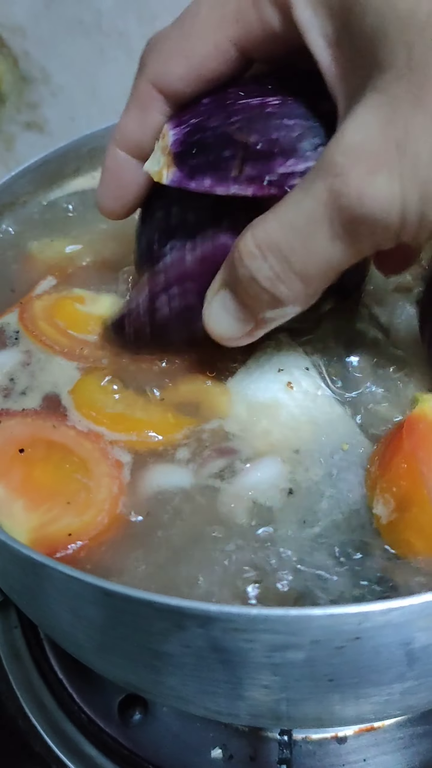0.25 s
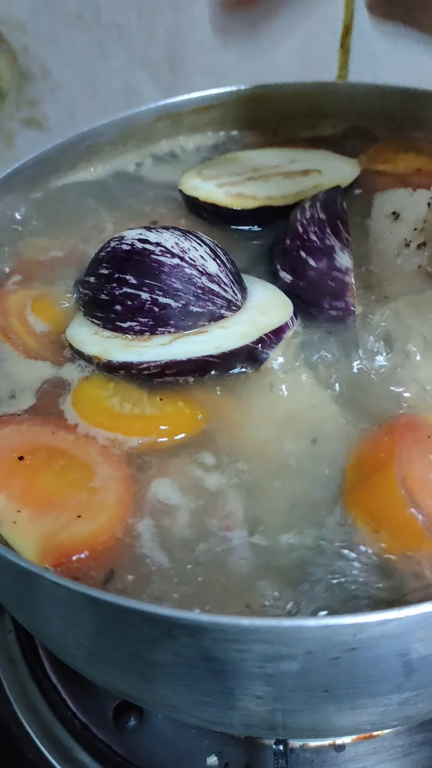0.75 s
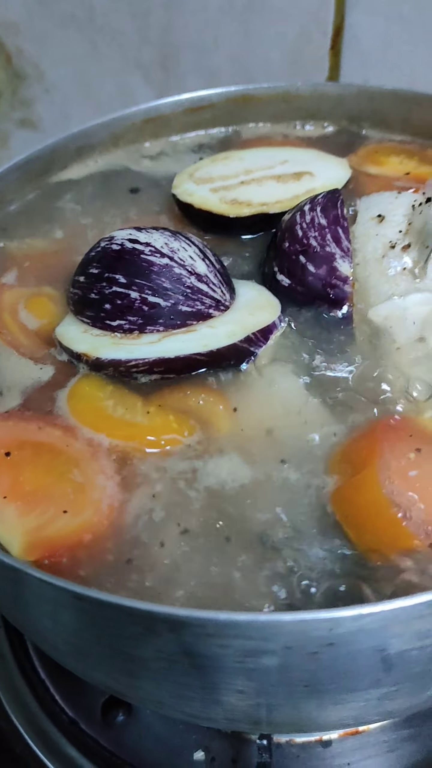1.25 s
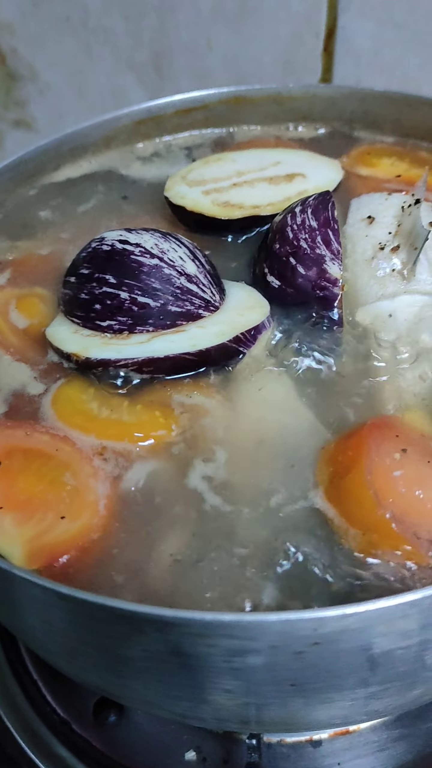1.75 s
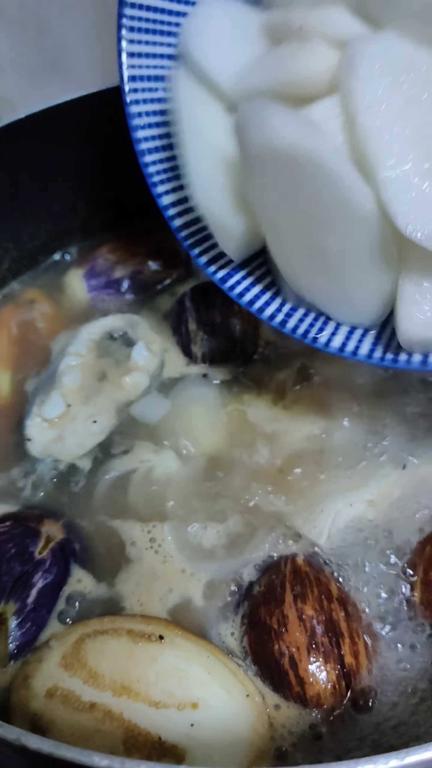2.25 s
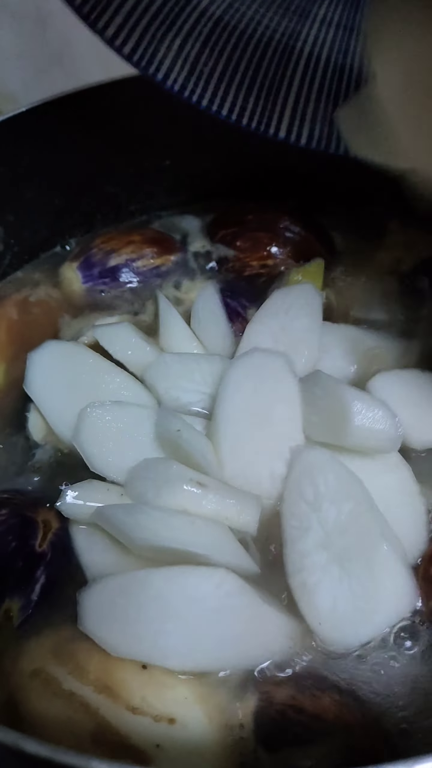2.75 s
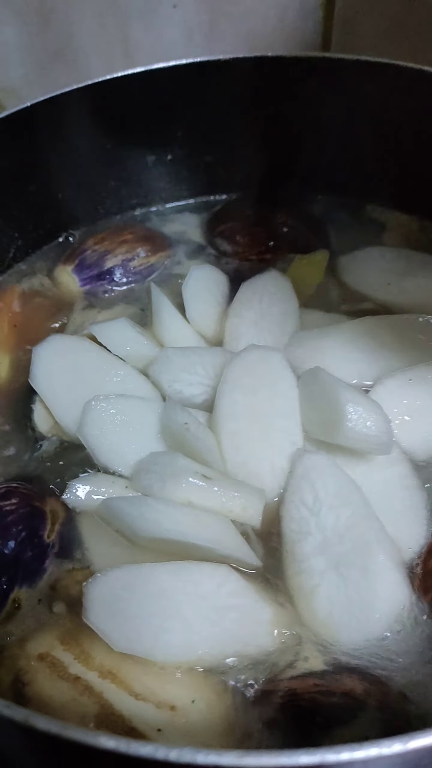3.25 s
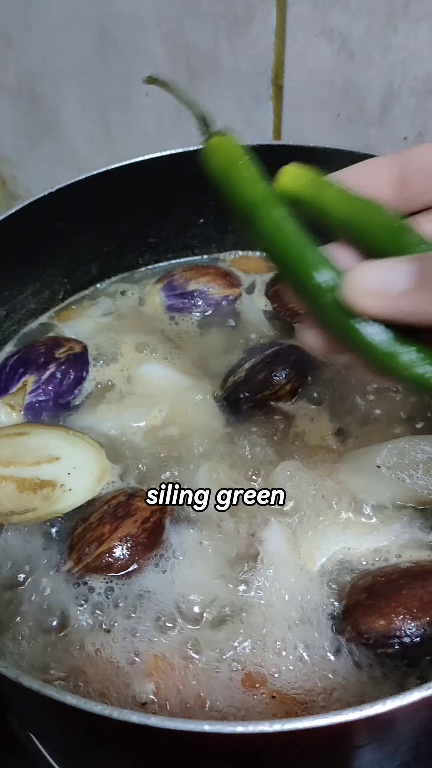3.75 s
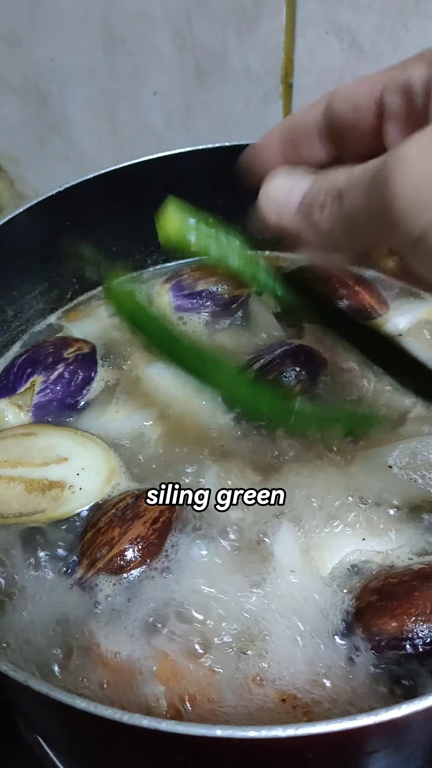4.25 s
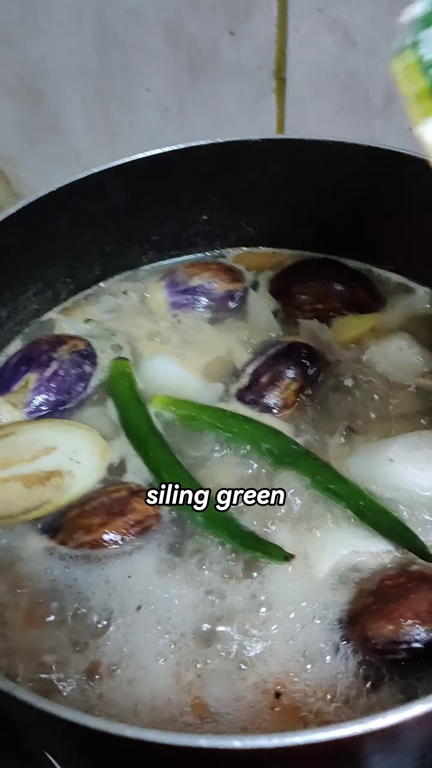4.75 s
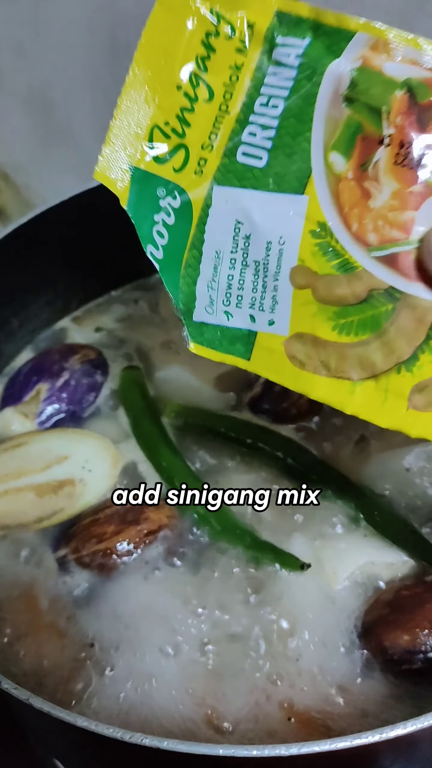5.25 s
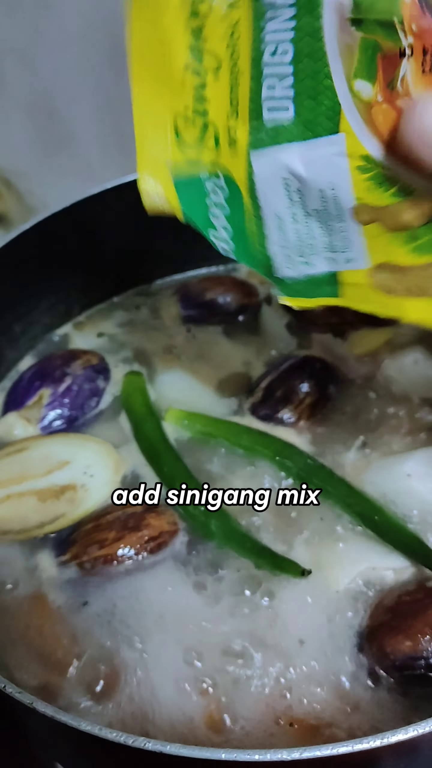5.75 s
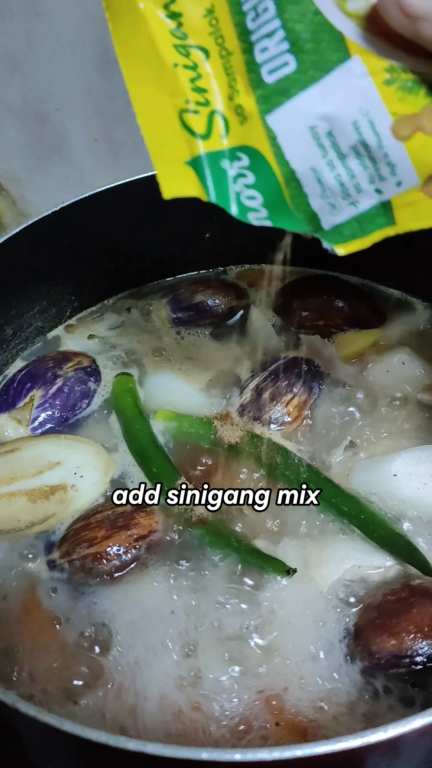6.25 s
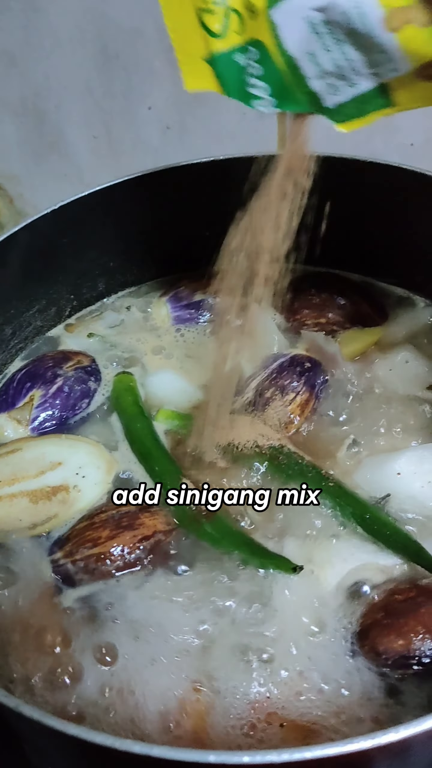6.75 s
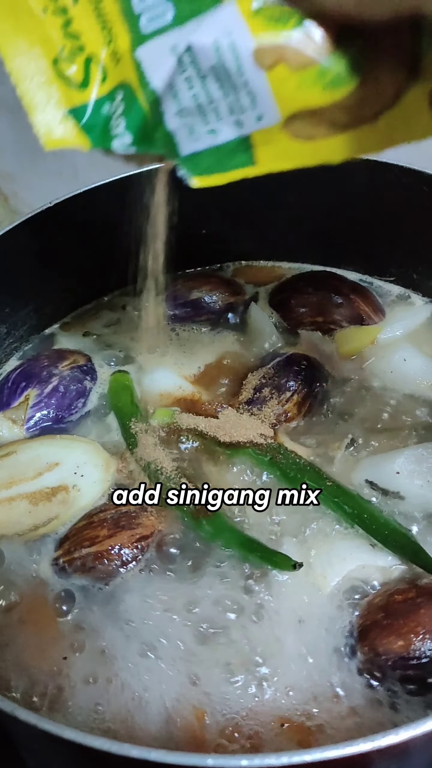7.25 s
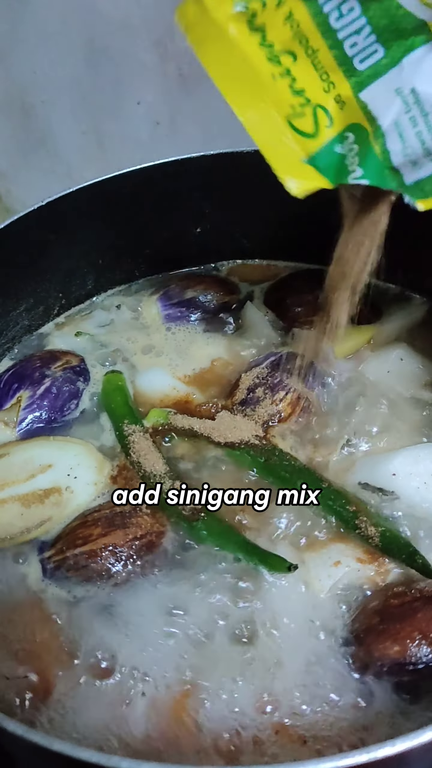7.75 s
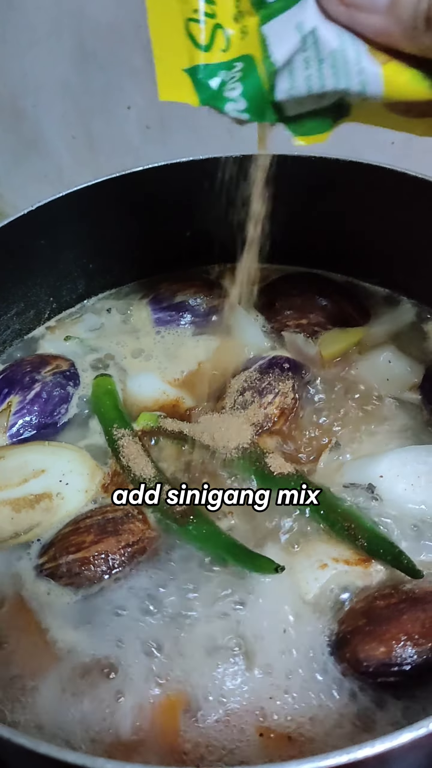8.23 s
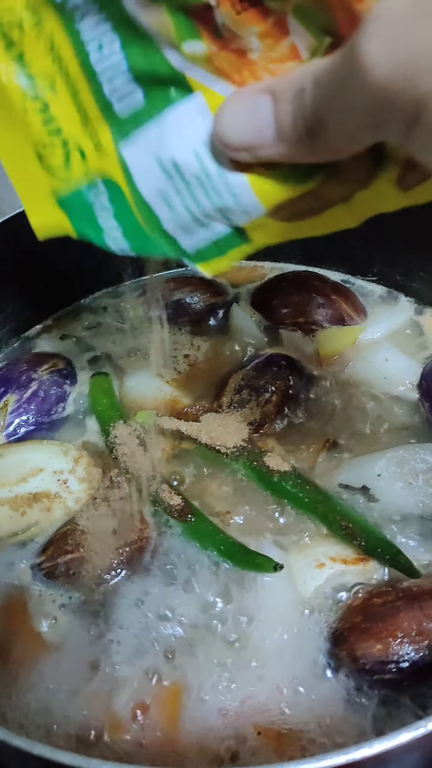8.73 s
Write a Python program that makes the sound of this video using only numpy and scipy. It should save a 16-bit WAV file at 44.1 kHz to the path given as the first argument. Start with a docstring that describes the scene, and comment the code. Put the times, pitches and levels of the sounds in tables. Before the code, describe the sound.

A wooden spatula knocks and scrapes a metal pot, wet plops and a ringing rim blow follow, then foil crackles loudly over boiling soup.

```python
"""A small tiled kitchen: soup boils in a metal pot, close to a microphone whose left port faces the stove.
Steam bubbles ring and rise in pitch, froth fizzes as dense crackle; a thin whistle and hiss lie behind.
A wooden spatula knocks (filtered bursts, damped pot modes) and scrapes (stick-slip crackle); low plops
(rising sines) and wet slaps (noise bursts) follow; one hard blow rings the rim's long, beating modes.
Then a foil sachet is shaken over the swelling boil: swarms of tiny creases and single loud snaps."""
import sys
import numpy as np
from scipy import signal
from scipy.fft import rfft, irfft, next_fast_len
from scipy.io import wavfile
from scipy.ndimage import uniform_filter1d

SR = 44100
rng = np.random.default_rng(int(sys.argv[2]) if len(sys.argv) > 2 else 0)


def inscribe(sig):
    """Save sig as 16-bit PCM at rate SR to the path in sys.argv[1].

    A 1-D sig is mono; a 2-D sig holds one channel per row.
    Samples are clipped to [-1, 1] before scaling.
    """
    pcm = np.round(np.clip(np.atleast_2d(sig).T, -1, 1) * 32767)
    wavfile.write(sys.argv[1], SR, pcm.astype(np.int16))


N = 396459
TIME = np.arange(N) / SR  # s
AGE = np.arange(SR * 3 // 4) / SR  # s since a blow


def amp(db):
    """Decibels to gain."""
    return 10 ** (np.asarray(db) / 20)


def unit(x):
    """x at rms 1."""
    return x / np.sqrt(np.mean(x ** 2) + 1e-20)


def unit_peak(x):
    """x with its loudest 4 ms at rms 1."""
    power = uniform_filter1d(x ** 2, size=176)
    return x / np.sqrt(power.max() + 1e-20)


def fade(t60_s):
    """Exponential decay, 60 dB down after t60_s."""
    return np.exp(-np.log(1000) * AGE / t60_s)


def along(points, hz):
    """Points of (frequency, value), interpolated on a log frequency axis."""
    f, v = np.transpose(points)
    return np.interp(np.log(hz + 1), np.log(f + 1), v)


def gains(rows, outside_db=None):
    """One gain curve per dB column after the time."""
    s, *columns = np.transpose(rows)
    return [amp(np.interp(TIME, s, c, outside_db, outside_db)) for c in columns]


def swells(rows, rise_s, t60_s):
    """Gain of (time, hold, dB) gestures: each rises until its time, holds, dies away; powers add."""
    power = np.zeros(N)
    for s, hold_s, db in rows:
        attack = np.minimum(AGE / rise_s, 1)
        release = np.exp(-np.log(1000) * np.maximum(AGE - rise_s - hold_s, 0) / t60_s)
        add(power, s - rise_s, (amp(db) * attack * release) ** 2)
    return np.sqrt(power)


def add(track, s, sound):
    """Mix a sound into the track at time s."""
    part = track[round(s * SR):][:len(sound)]
    part += sound[:len(part)]


def coloured(x, db_of):
    """x through the causal minimum-phase filter whose gain in dB is db_of(Hz)."""
    m = 2 * next_fast_len(len(x) // 2 + 4096)
    gain = amp(db_of(np.fft.rfftfreq(m, 1 / SR)))
    cepstrum = irfft(np.log(np.maximum(gain, 1e-6)), m)
    # folding the cepstrum makes the phase minimal
    cepstrum[1:m // 2] *= 2
    cepstrum[m // 2 + 1:] = 0
    return irfft(rfft(x, m) * np.exp(rfft(cepstrum)), m)[:len(x)]


def shaped(x, spectrum):
    """x filtered by a spectrum table, at rms 1."""
    return unit(coloured(x, lambda hz: along(spectrum, hz)))


def resonance_db(hz, centre_hz, width_hz):
    """Gain in dB of a narrow resonance."""
    return -20 * np.log10(1 + ((hz - centre_hz) / width_hz) ** 2)


def above(hz, edge_hz):
    """A soft step from 0 to 1 around an edge."""
    return hz ** 4 / (hz ** 4 + edge_hz ** 4)


def crackle(rate, spread_db, t60):
    """Decaying noise bursts at random times (rate per s), of scattered sizes; rms 1."""
    sizes = amp(spread_db * np.clip(rng.standard_normal(N), -2.5, 2.5))
    starts = rng.random(N) < rate / SR
    energy = signal.fftconvolve(starts * sizes ** 2, fade(t60) ** 2)[:N]
    return unit(np.sqrt(np.abs(energy)) * rng.standard_normal(N))


def bubbles(rate, low_hz, high_hz, cycles, spread_db, rise, size):
    """Bubbles (rate per s) that ring for a few cycles and rise in pitch as they surface; rms 1."""
    when, pitch, strength = rng.random((int(rate * N / SR), 3)).T[:, :, None]
    hz = low_hz * (high_hz / low_hz) ** pitch
    turns = hz * np.arange(size) / SR
    life = turns / cycles
    ring = np.sin(2 * np.pi * turns * (1 + rise * np.minimum(life, 2))) * np.exp(-life)
    ring *= hz * amp(-spread_db * np.log(np.maximum(strength, np.exp(-4))))
    places = (when * N).astype(int) + np.arange(size)
    return unit(np.bincount(places.ravel(), ring.ravel(), N)[:N])


def dying_noise(t60s):
    """Noise in which each frequency dies at its own speed."""
    hz, t, z = signal.stft(rng.standard_normal(len(AGE)), SR, nperseg=256)
    decay = np.exp(-np.log(1000) * t / along(t60s, hz)[:, None])
    return signal.istft(z * decay, SR, nperseg=256)[1][:len(AGE)]


# steady hiss spectrum: (frequency [Hz], level [dB])
HISS = [(1000, 5), (4000, 0), (7000, -10), (10000, 0), (13500, -7), (15300, 8.5), (16000, -16)]


def hiss(left_db=-64, right_db=-73):
    """Independent steady noise in each port."""
    return np.array([amp(db) * shaped(rng.standard_normal(N), HISS) for db in (left_db, right_db)])


def whistle(hz=5720, width_hz=170, db=-77):
    """A faint, thin, steady whistle: noise through a narrow resonance."""
    return amp(db) * unit(coloured(rng.standard_normal(N), lambda f: resonance_db(f, hz, width_hz)))


# course of the bubbling and froth, with quick rises where the soup is stirred or splashed:
# (time [s], bubbling level [dB], froth level [dB])
BOIL_COURSE = [(0.09, -57.5, -66), (1.16, -65.5, -78), (1.23, -57, -57.5), (1.44, -56.5, -65.5),
               (1.75, -42, -54.5), (2.05, -49.5, -49), (2.25, -56.5, -62), (2.48, -58.5, -57.5),
               (2.78, -38, -43), (3.2, -50.5, -55.5), (3.7, -47, -58), (3.73, -67, -72), (3.95, -58, -63),
               (4.39, -66.5, -74.5), (4.46, -55, -60.5), (5.75, -64, -66), (5.93, -52.5, -56.5),
               (6.65, -54, -55), (6.85, -51, -50.5), (8.5, -38.5, -37.5), (8.99, -42, -45)]
# broth heaving up as steam breaks through: (time [s], hold [s], level [dB])
HEAVES = [(0.27, 0.089, -57.5), (0.45, 0.046, -57.5), (0.78, 0.033, -61.5), (0.92, 0.024, -59),
          (2.58, 0.077, -42), (2.98, 0.033, -44), (3.38, 0.12, -46.5), (3.84, .03, -60.5),
          (4.92, 0.28, -60.5), (5.18, 0.073, -53), (5.5, 0.026, -54.5), (6.77, 0.15, -49),
          (7.42, 0.073, -43), (7.58, 0.023, -43.5), (8.01, 0.033, -50), (8.55, 0.055, -34.5)]
HEAVE_RISE_S, HEAVE_T60_S = 0.0283, .35
# rush of froth up the hot wall: (time [s], level [dB])
SURGE = [(3.3, -38.5), (3.54, -46.5), (3.62, -38), (3.70, -35.5), (3.712, -56), (3.73, -75)]
# spectrum of big steam bubbles: (frequency [Hz], level [dB])
RUMBLE = [(15, -60.5), (25, -22), (76, -7.5), (102, -11), (134, -2), (167, -5), (285, -8), (321, -12),
          (362, -8.5), (419, -27.5), (492, -14), (539, -39), (600, -3), (780, -39.5), (1320, -120)]
# spectrum of small surface bubbles: (frequency [Hz], level [dB])
BUBBLING = [(210, -36.5), (350, -1.5), (548, -8.5), (672, -4), (805, -7.5), (859, -6.5), (1260, -10),
            (1610, -10), (2840, -20.5), (4500, -32), (5850, -50), (9900, -120)]
# spectrum of the froth: (frequency [Hz], level [dB])
FIZZ = [(1290, -17), (2200, 0), (2890, -5.5), (4240, -6), (4640, -10), (5260, -12.5), (5620, -3),
        (6060, -6.5), (6750, 0.5), (9410, -16), (13200, -9), (15100, -6.5), (16000, -3)]
# spectrum of froth on the hot wall: (frequency [Hz], level [dB])
SIZZLE = [(59, -17), (100, -21.5), (271, -6), (350, -1.5), (461, -6), (634, -6.5), (1010, -8.5), (2130, -8),
          (5190, -20.5), (6840, -9.5), (9820, -24), (16000, -15.5)]
RUMBLE_DB, BUBBLING_DB, FIZZ_DB = 3.5, -1, 2.5  # each layer against its control


def boil():
    """Large steam bubbles rumble in the pot, small ones pop at the surface, and froth fizzes."""
    steady, froth = gains(BOIL_COURSE)
    strength = np.hypot(steady, swells(HEAVES, HEAVE_RISE_S, HEAVE_T60_S))
    surge, = gains(SURGE, outside_db=-120)
    deep = bubbles(rate=240, low_hz=70, high_hz=450, cycles=2.5, spread_db=1, rise=.02, size=3072)
    small = bubbles(rate=480, low_hz=400, high_hz=3500, cycles=4, spread_db=3, rise=.025, size=1024)
    pops = crackle(rate=1200, spread_db=4, t60=.02)
    rumble = shaped(deep + rng.standard_normal(N), RUMBLE)
    bubbling = shaped(small + amp(7.5) * pops, BUBBLING)
    fizz = shaped(crackle(rate=720, spread_db=3, t60=0.0052) + amp(2) * rng.standard_normal(N), FIZZ)
    sizzle = shaped(crackle(rate=3700, spread_db=5.5, t60=0.0082), SIZZLE)
    broth = strength * (amp(RUMBLE_DB) * rumble + amp(BUBBLING_DB) * bubbling)
    return broth + amp(FIZZ_DB) * froth * fizz + surge * sizzle


# ring of the pot, some modes in close pairs that beat:
# (frequency [Hz], level before scatter [dB], undamped t60 [s])
POT_MODES = [(998, -12, .5), (1330, -14, .25), (2591, -7, .55), (2615, -2, .68), (2690, -13, .35),
             (2750, -12, .42), (3423, -11, .45), (4060, -15, .35), (4310, -9, .42), (4363, -6, .62),
             (4378, -8, .56), (4820, -17, .33), (4890, -11, .5), (4960, -12, .4), (6508, -6, .3),
             (6548, -5, .36), (6590, -3, .48), (6990, -14, .33), (7607, -9, .32), (8270, -16, .24),
             (10200, -16, .25)]


def pot_ring(scatter_db, damping):
    """Decaying sines at the pot's modes, at new strengths and phases for each blow."""
    ring = np.zeros(len(AGE))
    chance = rng.standard_normal((len(POT_MODES), 2))
    for (hz, db, t60_s), (strength, phase) in zip(POT_MODES, chance):
        tone = np.sin(2 * np.pi * (hz * AGE + phase))
        ring += amp(db + scatter_db * strength) * tone * fade(t60_s / damping)
    return unit_peak(ring)


# wood against the pot: (time [s], level [dB], hardness [dB])
KNOCKS = [(0.073, -44.5, -60), (0.682, -38.5, -54), (1.172, -40.5, -20), (1.458, -21, -22.5),
          (1.51, -16, -22.5), (1.538, -18.5, -23.5), (1.563, -16.5, -32), (1.715, -25, -17.5)]
# pushes along the bottom: (time [s], hold [s], shudder level [dB], rasp level [dB])
STROKES = [(1.175, 0.084, -37.5, -45.5), (1.46, 0.016, -26, -37), (1.52, 0.074, -28, -35.5),
           (1.636, 0.052, -36, -36.5), (1.704, 0.023, -22, -29.5), (1.787, 0.033, -30.5, -35)]
STROKE_RISE_S, STROKE_T60_S = 0.0054, 0.2
# wet wood sticking and singing: (time [s], hold [s], level [dB])
SQUEAK = [(1.652, 0.012, -22)]
SQUEAK_HZ, SQUEAK_WIDTH_HZ, SQUEAK_RISE_S, SQUEAK_T60_S = 715, 40, 0.015, 0.053
# spectrum of a knock, before hardness: (frequency [Hz], level [dB])
WOOD = [(29, -43), (50, -10), (328, -7), (473, -12.5), (683, -2.5), (941, -17.5), (1330, -7.5), (1520, -17),
        (1710, -4.5), (3730, -25.5), (4280, -15.5), (5140, -48), (6610, -19.5), (7940, -55), (12000, -61),
        (15600, -84), (22000, -120)]
# low spectrum of a stroke: (frequency [Hz], level [dB])
SHUDDER = [(18, -66), (30, -22), (81, -7.5), (253, -8.5), (297, -5), (363, -2.5), (407, -17), (600, -23.5),
           (780, -30), (1320, -120)]
# scraping spectrum of a stroke: (frequency [Hz], level [dB])
RASP = [(260, -29), (450, -5.5), (806, 3.5), (908, -11.5), (1380, -6), (2510, -13), (3280, -23),
        (4230, -27), (4990, -30.5), (6530, -27.5), (8170, -34.5), (13000, -31.5), (15100, -26),
        (16000, -30.5)]


def spatula():
    """Wood knocks on the pot, damping its ring, then sticks and slips along the bottom."""
    out = np.zeros(N)
    soaked = lambda hz: -22 * (1 - above(hz, 4100))  # the soup soaks up the low modes
    for s, db, hardness_db in KNOCKS:
        burst = rng.standard_normal(len(AGE)) * (fade(.025) + amp(-9) * fade(.22))
        colour = lambda hz: along(WOOD, hz) + 0.68 * (hardness_db + 20.0) * above(hz, 1300)
        thud = unit_peak(coloured(burst, colour))
        ring = unit_peak(coloured(pot_ring(scatter_db=2, damping=3), soaked))
        add(out, s, amp(db - 3.5) * (thud + amp(hardness_db + 2.0) * ring))
    last_ring = ring
    shudders = shaped(crackle(rate=600, spread_db=2, t60=.02), SHUDDER)
    slips = shaped(crackle(rate=600, spread_db=3.5, t60=.015), RASP)
    singing = unit(signal.fftconvolve(slips, last_ring)[:N])  # every slip rings the wall again
    shudder = swells([(s, hold_s, db) for s, hold_s, db, _ in STROKES], STROKE_RISE_S, STROKE_T60_S)
    rasp = swells([(s, hold_s, db) for s, hold_s, _, db in STROKES], STROKE_RISE_S, STROKE_T60_S)
    note = unit(coloured(slips, lambda hz: resonance_db(hz, SQUEAK_HZ, SQUEAK_WIDTH_HZ)))
    out += amp(-0.5) * shudder * shudders
    out += rasp * (amp(1.5) * slips + amp(-31) * singing)
    return out + swells(SQUEAK, SQUEAK_RISE_S, SQUEAK_T60_S) * note


# low, rising plops: pieces dropping in, gulps of the boil, one thump under the spatula:
# (time [s], level [dB], starting pitch [Hz], t60 [s])
PLOPS = [(0.681, -43.5, 138.3, 0.56), (1.714, -19, 299, .3), (2.49, -33, 139.7, 1), (2.557, -28, 206, 0.13),
         (2.6, -23.5, 207, 0.063), (2.753, -19, 167, 0.1), (2.871, -16.5, 188, 0.065),
         (2.888, -19, 141, 0.13), (4.408, -32.5, 135, 0.24), (5.191, -44.5, 143, 0.39),
         (5.497, -43, 200, .14), (6.467, -39, 137, 0.29), (8.551, -23, 133.3, 0.42)]
PLOP_SWELL_S, PLOP_RISE = 0.0022, .16  # onset; share by which the pitch climbs
# wet slaps and big bubbles bursting: (time [s], level [dB], spray [dB])
SPLATS = [(0.31, -35.5, -9.5), (1.965, -23.5, -9), (2.185, -34, -2), (2.577, -27, -23), (2.645, -29.5, -11),
          (2.68, -26.5, -17.5), (2.758, -23.5, -9), (2.834, -27, -43.5), (2.895, -24, -12),
          (2.959, -27, -6), (2.98, -23, -18), (3.847, -41, -15.5), (3.966, -41.5, -34), (4.409, -41.5, -10),
          (4.44, -34, -10)]
# spectrum of a slap, before spray: (frequency [Hz], level [dB])
SLAP = [(200, -16.5), (400, -6.5), (700, 9.5), (1300, -9.5), (3000, -10.5), (5000, -21), (6800, -8.5),
        (9500, -24), (15500, -18)]


def splashes():
    """Plops are low decaying sines that rise in pitch; slaps and bursting bubbles throw spray."""
    out = np.zeros(N)
    for s, db, hz, t60_s in PLOPS:
        envelope = np.minimum(AGE / PLOP_SWELL_S, 1) ** 2 * fade(t60_s)
        pitch_hz = hz * (1 + PLOP_RISE * (1 - fade(3 * t60_s)))
        tone = np.sin(2 * np.pi * np.cumsum(pitch_hz) / SR)
        add(out, s, amp(db - 4) * unit_peak(envelope * tone))
    for s, db, spray_db in SPLATS:
        burst = rng.standard_normal(len(AGE)) * (fade(.04) + amp(-11) * fade(.2))
        colour = lambda hz: along(SLAP, hz) + 2.2 * (spray_db + 12.0) * above(hz, 3500)
        add(out, s, amp(db - 7.0) * unit_peak(coloured(burst, colour)))
    return out


# blow on the rim: (time [s], level [dB])
CLANG = [(3.219, -7)]
# spectrum of the blow, before scaling: (frequency [Hz], level [dB])
METAL = [(59, -41), (100, -32), (373, -21.5), (801, -16), (991, -11), (1100, -17), (1360, -12), (2220, -23),
         (2630, 4), (3050, -20.5), (4380, -18), (6150, -34), (6700, -7.5), (9210, -42.5), (16000, -37)]
# decay of the dense modes: (frequency [Hz], t60 [s])
METAL_T60 = [(200, 0.13), (1000, 0.81), (2700, 0.82), (7000, 0.71), (14000, 0.3)]


def rim():
    """A hard blow: a crack, a wash of dense modes, and a few long clear ones."""
    out = np.zeros(N)
    for s, db in CLANG:
        burst = rng.standard_normal(len(AGE)) * fade(0.028)
        crack_db = lambda hz: 0.68 * along(METAL, hz) - 8 * above(hz, 1700) - 5 * above(hz, 7300)
        crack = unit_peak(coloured(burst, crack_db))
        wash_db = lambda hz: 0.56 * along(METAL, hz) - 6 * above(hz, 9600)
        wash = unit_peak(coloured(dying_noise(METAL_T60), wash_db))
        ring = pot_ring(scatter_db=.5, damping=1) + amp(-5) * wash
        add(out, s, amp(db - 7.5) * crack + amp(db - 13.5) * ring)
    return out


# loudest creases snapping: (time [s], level [dB], tilt [dB per octave])
SNAPS = [(4.724, -29, .5), (4.967, -32.5, -1.5), (5.089, -29.5, -2.5), (5.148, -25.5, 1.5),
         (5.901, -31.5, -2), (5.98, -31.5, 1), (6.149, -27, -0.5), (6.18, -24.5, 5.5), (6.425, -17, 4.5),
         (6.822, -18.5, -4.5), (6.943, -23, 0.5), (6.974, -16.5, 5), (7.169, -15, 2.5), (7.278, -15, -2),
         (7.364, -17, -1.5), (7.404, -21.5, -6), (7.455, -16.5, 1), (7.639, -12, 2.5), (7.733, -19.5, 0),
         (7.802, -17, 2.5), (7.837, -11, 1), (7.852, -7, 3), (7.861, -9, 1.5), (7.927, -16.5, 1.5),
         (7.998, -13, 2.5), (8.015, -12, -1), (8.142, -15, 4.5), (8.267, -12, -1), (8.336, -19, .5),
         (8.431, -7, 1), (8.703, -20, -2.5), (8.803, -10.5, 3.5), (8.866, -8.5, 0.5), (8.94, -10, 2.5)]
TILT_PIVOT_HZ, SNAP_DELAY_S = 4000, .0013
# shakes of the sachet: (time [s], hold [s], rustle level [dB])
SHAKES = [(5.80, 0.033, -56.5), (5.93, 0.052, -45.5), (6.15, 0.04, -49), (6.445, 0.012, -45.5),
          (6.84, .015, -33), (6.975, .015, -41.5), (7.17, 0.046, -40.5), (7.28, 0.027, -38),
          (7.37, 0.096, -36), (7.58, 0.063, -32), (7.85, 0.06, -32), (8.01, 0.028, -24),
          (8.155, 0.03, -23.5), (8.30, 0.054, -21.5), (8.444, 0.0061, -20), (8.565, 0.053, -25.5),
          (8.808, 0.014, -29.5), (8.87, .025, -24), (8.98, .02, -24.5)]
SHAKE_RISE_S, SHAKE_T60_S = 0.032, 0.18
SETTLE_DB, SETTLE_T60_S = -19, 0.52  # the foil goes on unfolding after each shake
# stray creases grow more slowly than the swarm, so stand out in a gentle shake
TICK_DB, TICK_GROWS = -11, .7
# spectrum of creasing foil: (frequency [Hz], level [dB])
FOIL = [(350, -27.5), (600, -2.5), (858, -0.5), (1210, -9.5), (1490, -4), (1830, -8.5), (2120, 1),
        (2370, -5), (3940, -1.5), (5050, -10), (6640, 0.5), (10000, -14), (13800, -8), (15100, -5.5),
        (16000, -12.5)]


def sachet(hard_shake_db=-25):
    """Each shake flexes the foil: a swarm of small creases, and single loud snaps."""
    shake = swells(SHAKES, SHAKE_RISE_S, SHAKE_T60_S)
    shake += amp(SETTLE_DB) * swells(SHAKES, SHAKE_RISE_S, SETTLE_T60_S)
    creases = crackle(rate=1000, spread_db=4, t60=.01)
    creases += amp(-5.5) * crackle(rate=200, spread_db=3.5, t60=.004)
    out = amp(-3.0) * shake * shaped(creases, FOIL)
    ticks = shaped(crackle(rate=45, spread_db=3, t60=.006), FOIL)
    out += amp(hard_shake_db + TICK_DB) * (shake / amp(hard_shake_db)) ** TICK_GROWS * ticks
    for s, db, tilt_db in SNAPS:
        # a lone crease flips within milliseconds; in a hard shake it sets off its neighbours
        chain = min(shake[round(s * SR)] / amp(hard_shake_db), 1)
        burst = rng.standard_normal(len(AGE)) * (fade(.002) + (.25 + .5 * chain) * fade(.024))
        octaves = lambda hz: np.log2(np.maximum(hz, FOIL[1][0]) / TILT_PIVOT_HZ)
        colour = lambda hz: along(FOIL, hz) + tilt_db * octaves(hz)
        add(out, s + SNAP_DELAY_S, amp(db - 8.5) * unit_peak(coloured(burst, colour)))
    return out


# decay of the room: (frequency [Hz], t60 [s])
KITCHEN_T60 = [(100, 0.35), (1000, 0.21), (6000, 0.18), (15000, 0.26)]


def kitchen(x):
    """The tiled walls answer 5 ms later with a decaying noise tail, mostly above the bass."""
    tail = unit(dying_noise(KITCHEN_T60)) / np.sqrt(len(AGE))
    tail = np.pad(tail, (SR // 200, 0))
    tail = coloured(tail, lambda hz: -10 * (1 - above(hz, 266)))
    return signal.fftconvolve(x, tail)[:N]


# left port over right: (frequency [Hz], level [dB])
LEFT_LEAD = [(60, 1.0), (110, 0.26), (200, 1.1), (380, 4.6), (700, 9.1), (1290, 14.5), (2380, 17.3),
             (4400, 21), (8120, 26.5), (15000, 15.7)]
# share of the left signal in the right: (frequency [Hz], likeness [0-1])
ALIKE = [(60, 0.56), (150, 0.74), (380, 0.21), (950, 0.67), (2380, 0.73), (5980, 0.52), (15000, 0.59)]
RIM_ROOM_DB = -6  # the rim is nearest to the microphone, so its ring is drier than the rest


def scene():
    """The left port faces the pot and leads, most in the treble; the shaded right adds more of the walls."""
    pot = boil() + whistle() + spatula() + splashes() + sachet()
    clang = rim()
    to_walls = pot + amp(RIM_ROOM_DB) * clang
    near = pot + clang + amp(-7.5) * kitchen(to_walls)
    m = next_fast_len(N + SR // 2)
    hz = np.fft.rfftfreq(m, 1 / SR)
    alike = np.clip(along(ALIKE, hz), 0, 1)
    lead = amp(along(LEFT_LEAD, hz))
    left = rfft(near, m)
    walls = rfft(kitchen(to_walls), m)
    right = alike * left + np.sqrt(1 - alike ** 2) * amp(1.0) * walls
    ports = 2 * np.array([lead * left, right]) / (1 + lead)
    return irfft(ports, m)[:, :N] + hiss()


# overall level, with a fade-in and a brief dip: (time [s], level [dB])
LEVEL = [(0, -40), (.055, -25), (.07, -0.5), (3.705, 3.5), (3.712, -17), (3.733, -38), (3.745, 2)]
TOP_HZ = 16000


def record(dry):
    """The level fades in and later dips briefly, the tallest peaks clip, nothing passes above TOP_HZ."""
    level, = gains(LEVEL)
    m = next_fast_len(N + SR // 2)
    clipped = np.clip(dry * level, -1, 1)
    passed = np.fft.rfftfreq(m, 1 / SR) < TOP_HZ
    return irfft(rfft(clipped, m) * passed, m)[:, :N]


dry = scene()
out = record(dry)
inscribe(out)
```